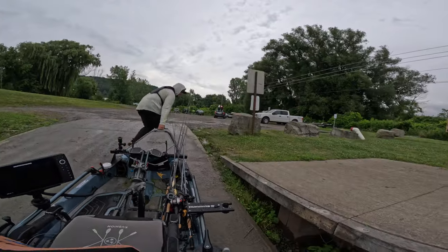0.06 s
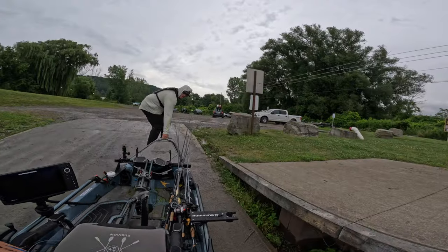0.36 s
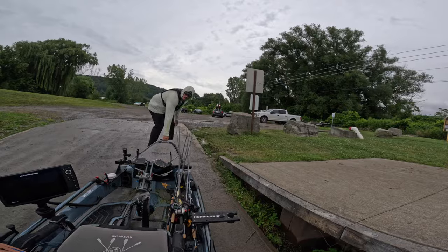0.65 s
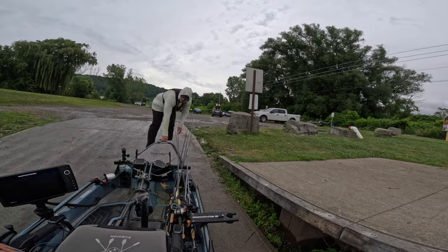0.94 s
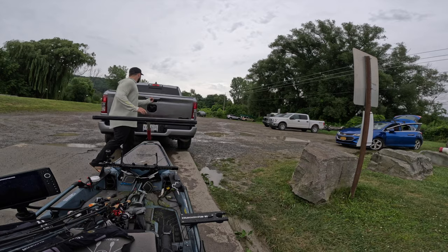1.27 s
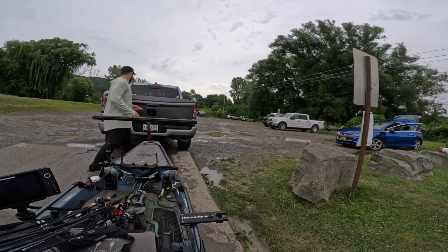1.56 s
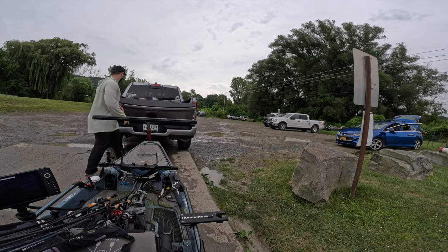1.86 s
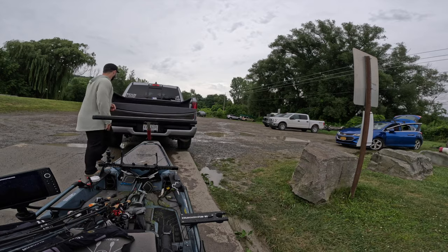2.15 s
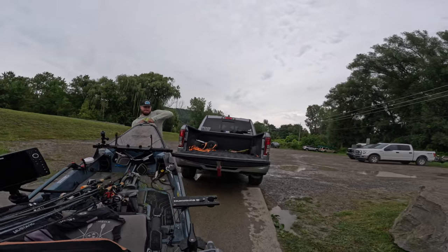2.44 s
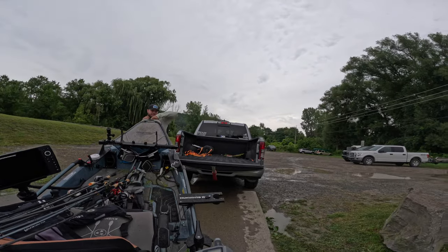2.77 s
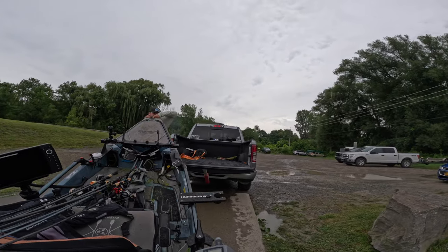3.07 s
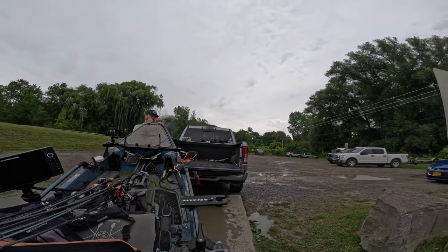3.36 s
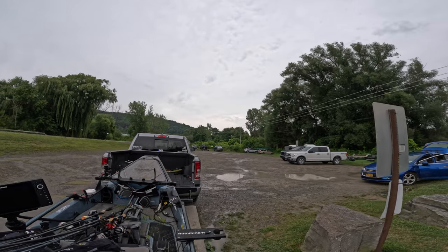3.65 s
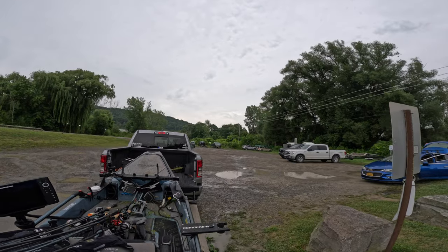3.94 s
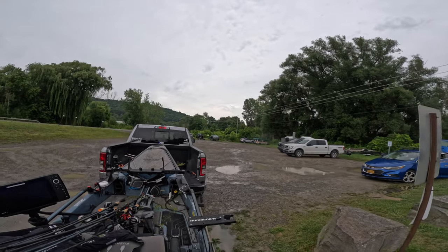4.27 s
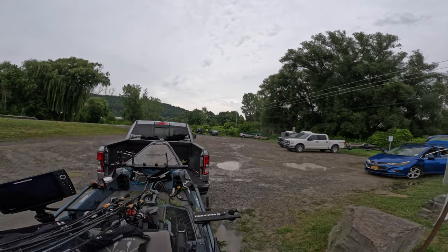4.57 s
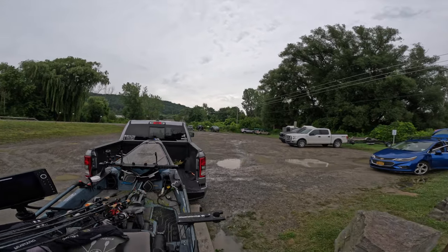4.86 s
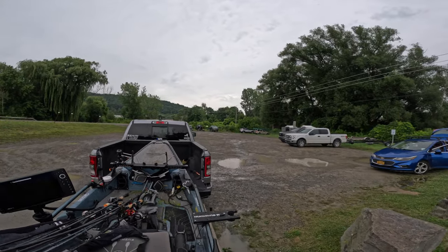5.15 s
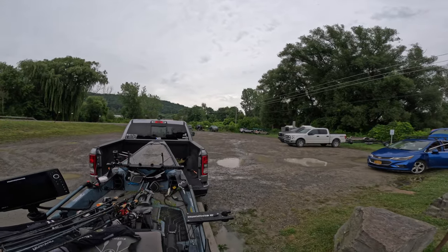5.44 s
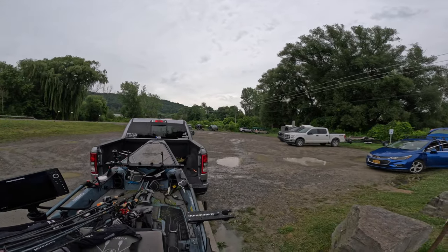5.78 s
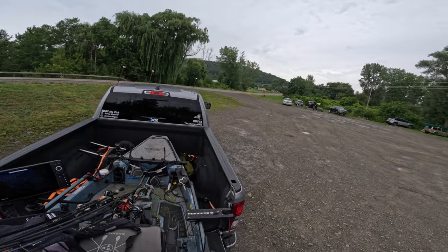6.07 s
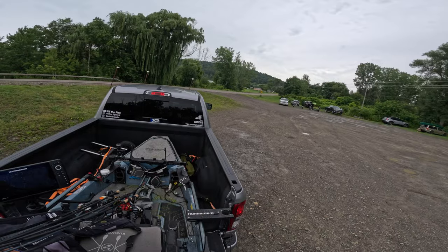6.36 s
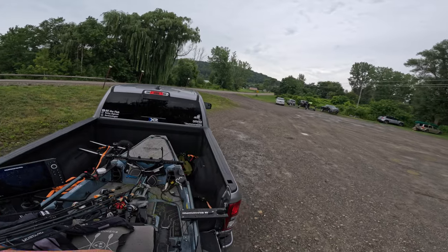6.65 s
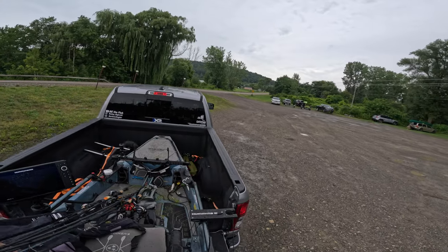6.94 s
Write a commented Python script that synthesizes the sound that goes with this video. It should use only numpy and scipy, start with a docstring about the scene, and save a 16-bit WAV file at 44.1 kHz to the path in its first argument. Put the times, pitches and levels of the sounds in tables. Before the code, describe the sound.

Over low wind and an idling truck, a tailgate clunks open, then a hollow kayak drops on it, bounces and is shoved aboard, gear knocking.

```python
"""A plastic fishing kayak full of gear is hauled up a concrete ramp to an idling pickup, in five shots.
Wind rumbles on the microphone, carried at the stern, as the keel rasps and the bow scuffs the ramp.
Close behind the truck the exhaust throbs, and the tailgate unlatches with a boom.
After more hauling, heard from beside the truck, the bow drops on the tailgate and bounces.
Last, the hollow hull is shoved into the bed, thumping and shuddering while its gear knocks."""
import sys
import numpy as np
from scipy import signal
from scipy.fft import rfft, irfft, next_fast_len
from scipy.io import wavfile

SR = 44100
rng = np.random.default_rng(int(sys.argv[2]) if len(sys.argv) > 2 else 0)


def wav_record(signal):
    """Record a signal, one row per channel, as 16-bit PCM in the file named by sys.argv[1]."""
    frames = np.transpose(np.atleast_2d(signal))
    bounded = np.clip(frames, -1, 1)
    # unit amplitude maps onto the largest positive 16-bit level
    quanta = np.round(bounded * 32767).astype(np.int16)
    wavfile.write(sys.argv[1], SR, quanta)


N = 318181
TIME = np.arange(N) / SR


def from_db(db):
    """Decibels to gain."""
    return 10 ** (np.asarray(db) / 20)


def rms_one(x):
    """Scale to rms 1."""
    return x / np.sqrt(np.mean(x ** 2) + 1e-20)


def at_hz(points, hz):
    """Read a spectrum on a log-frequency axis."""
    f, value = np.transpose(points)
    return np.interp(np.log(hz + 1), np.log(f), value)


def butter(x, hz, kind, order=2):
    """Causal Butterworth filter."""
    sos = signal.butter(order, np.clip(hz, 10, .45 * SR), kind, fs=SR, output="sos")
    return signal.sosfilt(sos, x)


def drift(rate):
    """Smooth random wander of spread 1."""
    r = np.exp(-80 * np.pi * rate / SR)
    slow = signal.lfilter([1], [1, -2 * r, r * r], rng.standard_normal(N // 40 + 2002))[2000:]
    return np.interp(np.arange(N) / 40, np.arange(len(slow)), rms_one(slow))


def panned(pan_db):
    """Left and right gains of constant power; positive is left."""
    gains = from_db(np.array([[.5], [-.5]]) * pan_db)
    return gains / np.sqrt(np.mean(gains ** 2, axis=0))


def white():
    """Two unrelated white noises."""
    return rng.standard_normal((2, N))


def grit(per_s, spread_db):
    """Tiny random slips of very unequal size."""
    slips = white() * (rng.random(N) < per_s / SR)
    return slips * from_db(spread_db * np.minimum(rng.exponential(1, N), 4))


def ring(push, hz, t60, order=1):
    """A unit click sets a sine of height 1 ringing; at order 2 it swells first."""
    r, w = from_db(-60 / (t60 * SR)), 2 * np.pi * hz / SR
    for gain in [1, 2 * np.e * (1 - r)][:order]:
        push = signal.lfilter([gain * np.sin(w)], [1, -2 * r * np.cos(w), r * r], push + 1e-18)
    return push


def add(out, s, sound):
    """Mix a sound in from time s."""
    start = max(round(s * SR), 0)
    out[:, start:start + sound.shape[-1]] += sound[..., :N - start]


def ramp(start_s, length_s):
    """Rise evenly from 0 to 1."""
    return np.clip((TIME - start_s) / length_s, 0, 1)


def stroke(s, length_s, attack_s, sag_db_per_s, release_s):
    """One effort: it builds, tires slowly while held, then dies away."""
    t = np.maximum(TIME - s, 0)
    release = np.exp(-np.clip((t - length_s) / release_s, 0, 30))
    return ramp(s, attack_s) * from_db(-sag_db_per_s * t) * release


# Edges of the shots, in seconds.
CUTS = [0, 1.017, 2.316, 3.435, 5.937, 7.3]
# Microphone on the ramp, behind the truck, beside it, at the tailgate, over the bed. Each row: hiss in
# dB from 2.5 to 8 kHz, wind in dB, engine in dB, stereo opening from 0 (mono) to 1 (wide).
SHOTS = [(-67, -46.5, -95, 0.0026), (-55, -50, -36, 0.79), (-59.5, -40.5, -47, 0.0022),
         (-58, -29.5, -51.5, 1), (-67.5, -39, -58, 0.01)]

def by_shot():
    """Hiss, wind, engine and stereo opening at every sample; each holds until the next cut."""
    return np.array(SHOTS)[np.searchsorted(CUTS, TIME, side="right") - 1].T


# Noise across the microphone's two sides. Each row: frequency in Hz, left-right likeness.
LIKENESS = [(35, 0.8), (130, 1.05), (1000, 0.97)]
# Each row: frequency in Hz, left minus right in dB.
BALANCE = [(400, -3), (1200, 3), (4000, 8)]

def coloured(pair, spectrum, skirt_db_per_octave=30.0):
    """Two unrelated noises become left and right at rms 1, falling off past the spectrum's ends."""
    size = next_fast_len(N)
    hz = np.fft.rfftfreq(size, 1 / SR) + 1
    mid, side = rfft(pair, size)
    alike = np.clip(at_hz(LIKENESS, hz), -1, 1)
    both = np.sqrt(1 + alike) * mid + np.sqrt(1 - alike) * side * [[1], [-1]]
    octaves_out = np.abs(np.log2(hz / np.clip(hz, spectrum[0][0], spectrum[-1][0])))
    gain = from_db(at_hz(spectrum, hz) - skirt_db_per_octave * octaves_out)
    return rms_one(irfft(both * panned(at_hz(BALANCE, hz)) * gain, size)[:, :N])


# Air and engine hiss at the five microphone positions. Each row: frequency in Hz, relative level in dB.
RAMP_AIR = [(100, -12), (300, -14.5), (1200, -15.5), (3200, -29), (7200, -36)]
TRUCK_AIR = [(110, -3), (390, -0.5), (480, -8), (1150, -8.5), (1800, -18), (3500, -21), (4500, -27),
             (7000, -29)]
SIDE_AIR = [(70, 13), (160, -5), (370, -9), (750, -24.5), (1200, -23), (3600, -27), (7500, -41.5)]
GATE_AIR = [(140, 5.5), (300, -18), (650, -21), (1400, -16.5), (2800, -32), (4800, -41), (7400, -46)]
BED_AIR = [(70, 10.5), (210, -5.5), (360, 5), (500, -13), (1300, -16.5), (3000, -25), (5000, -36.5),
           (7200, -37)]

def air(level_db, engine_beat, throb=0.044, bow_down_s=4.35, fall_db=-6.5):
    """Outdoor hiss throbs near the engine; once the bow is down it drops until the next cut."""
    out = np.zeros((2, N))
    for start, end, colour in zip(CUTS, CUTS[1:], [RAMP_AIR, TRUCK_AIR, SIDE_AIR, GATE_AIR, BED_AIR]):
        noise = coloured(white(), colour)
        treble = np.std(butter(noise, [2500, 8000], "band"))
        out += noise / treble * (TIME >= start) * (TIME < end)
    bow_down = ramp(bow_down_s, 0.021) * (TIME < CUTS[4])
    return out * from_db(level_db + fall_db * bow_down) * (1 + throb * engine_beat)


# Wind right on the microphone. Each row: frequency in Hz, relative level in dB.
WIND = [(22, -1.5), (30, 2.5), (44, -8), (70, -12.5)]

def wind(level_db, lumps_db=2.0, lull_db=-6):
    """Lumpy low turbulence; it lulls while the bow is lifted."""
    lull = (TIME >= CUTS[3]) * (TIME < LANDINGS[0][0])
    return from_db(level_db + lull_db * lull + lumps_db * drift(22)) * coloured(white(), WIND)


# The keel on ramp, tailgate and bed. Each row: start in seconds, length in seconds, level in dB.
SLIDES = [(0, 0.21, -54.5), (2.146, 0.08, -46.5), (2.393, 0.26, -46.5), (4.64, 1.28, -42),
          (5.06, 0.11, -38.5)]
# Its rasp. Each row: frequency in Hz, relative level in dB.
RASP_COLOUR = [(250, 7.5), (400, 7), (620, 6.5), (1300, 1.5), (2800, -18), (4500, -27), (7000, -36.5)]
# The loose gear aboard. Each row: frequency in Hz, relative level in dB, t60 in seconds.
GEAR_MODES = [(399, 6.7, 0.014), (1100, 7, 0.0079), (2050, 6.7, 0.005)]

def keel_scrape(shake, chafe_db=-19.5, judder_db=1.8, catch_db=-4.5):
    """The keel rasps as it slides, chafes as the hull shakes, and catches on grit, jolting the gear."""
    slides = [from_db(db) * stroke(s, length, attack_s=0.019, sag_db_per_s=7, release_s=0.015)
              for s, length, db in SLIDES]
    friction = np.sqrt((shake * from_db(chafe_db)) ** 2 + sum(slide ** 2 for slide in slides))
    rasp = coloured(grit(6000, 1.9), RASP_COLOUR)
    jolts = grit(per_s=140, spread_db=2)[0] * from_db(judder_db * drift(12))
    catches = rms_one(sum(from_db(db) * ring(jolts, hz, t60) for hz, db, t60 in GEAR_MODES))
    return friction * from_db(judder_db * drift(20)) * (rasp + from_db(catch_db) * catches)


# Spells of faint ticking. Each row: start in seconds, end in seconds, level in dB.
TICKING = [(0, 0.285, -61), (0.563, 1.015, -70), (5.95, 7.204, -72.5)]

def jiggle():
    """Grit and loose fittings crunch in dry clumps while the kayak is moved."""
    moved = sum(from_db(db) * (TIME >= start) * (TIME < end) for start, end, db in TICKING)
    clumps = from_db(6 * np.minimum(drift(16), 1.8))
    ticks = butter(grit(3000, 2)[0], [1700, 3900], "band", order=3) * clumps
    return moved * rms_one(ticks)


def thumps(rows, pan_db=-3.0, push_s=0.0022, overtone_ratio=1.77, overtone_db=-13):
    """A soft push sets a panel swinging, with a shorter overtone."""
    out, t = np.zeros((2, N)), TIME[:SR // 2]
    for s, db, hz, t60 in rows:
        phase, decay = 2 * np.pi * hz * t, from_db(-60 * t / t60)
        overtone = from_db(overtone_db) * np.sin(overtone_ratio * phase) * decay ** 2
        onset = 1 - np.exp(-(t / push_s) ** 2)
        swing = (np.sin(phase) * decay + overtone) * onset
        add(out, s, from_db(db) * swing / np.abs(swing).max() * panned(pan_db))
    return out


PANEL_CYCLES = 16.6   # swings of a hull panel until it has died by 60 dB
# Shoves on the kayak. Each row: start in seconds, peak in dB, panel pitch in Hz, shudder in seconds.
SHOVES = [(0.049, -29, 77, 0.22), (0.217, -25.5, 91, 0.37), (0.504, -22, 204, 0.021),
          (2.329, -26, 137, 0.45), (3.431, -25.5, 103, 0.0048), (3.913, -28, 119, 0.87),
          (4.789, -20, 124, 0.26), (5.091, -21.5, 131.6, 0.14), (5.363, -16.5, 98, 0.011),
          (5.498, -25, 160, 0.3), (5.665, -28.5, 96, 0.195), (6.184, -27, 179.4, 0.072),
          (6.454, -32, 175, 0.053), (6.705, -28, 248, 0.1), (6.967, -25.5, 120, 0.053)]

def shove_thumps():
    """Each shove thumps a plastic panel of the hull."""
    return thumps([(s, db, hz, PANEL_CYCLES / hz) for s, db, hz, _ in SHOVES])


def shaking(against_shove_db=-7, rest_db=-44.5):
    """How hard the hull shakes: a little at rest, more after every shove."""
    power = from_db(rest_db) ** 2
    for s, db, _, length in SHOVES:
        effort = stroke(s, length, attack_s=0.012, sag_db_per_s=26.5, release_s=0.023)
        power += (from_db(db + against_shove_db) * effort) ** 2
    return np.sqrt(power)


# The hollow hull, heard from the stern. Each row: frequency in Hz, relative level in dB.
HOLLOW = [(60, 7), (100, 4), (170, -2), (260, -9), (400, -19.5)]

def hull_shudder(shake):
    """Small slips shake the hull into a low rumble."""
    return shake * coloured(grit(900, 1.0), HOLLOW) * panned(-3.5)


def blows(rows, modes, rattle, tail_db, tail_s, pan_db, treble_pan_db=0, order=1):
    """A contact and its dying rattle ring the modes; loose parts buzz on; high modes may lean left."""
    out, t = np.zeros((2, N)), TIME[:SR // 2]
    sides = [panned(pan_db + at_hz([(1000, 0), (8000, treble_pan_db)], hz)) for hz, _, _ in modes]
    for s, db, hard_hz, rattle_s in rows:
        noise = rng.standard_normal((3, len(t)))
        chatter = noise[0] * np.exp(-t / rattle_s) * np.sqrt(2 / (rattle_s * SR))
        buzz = noise[1:] * np.exp(-t / tail_s) * np.sqrt(2 / (tail_s * SR))
        push = butter((t == 0) + rattle * chatter + from_db(tail_db) * buzz, hard_hz, "low")
        body = sum((-1) ** k * sides[k] * from_db(mode_db) * ring(push, hz, t60, order)
                   for k, (hz, mode_db, t60) in enumerate(modes))
        body = butter(body, 140, "high")
        strength = np.sqrt(np.sum(body ** 2) / (2 * .01 * SR))   # rms if packed into 10 ms
        add(out, s, from_db(db) * body / strength)
    return out


# Blows on the hull. Each row: start in seconds, level in dB, hardness in Hz, rattle in seconds.
HULL_KNOCKS = [(0.211, -35, 395, 0.015), (2.417, -34, 1900, 0.0085), (2.455, -35.5, 3000, 0.012),
               (2.591, -37.5, 1700, 0.0045), (4.219, -20, 6000, 0.0039), (4.317, -40, 300, 0.0055),
               (4.487, -31.5, 590, 0.014), (4.549, -32, 6000, 0.017), (5.347, -36, 2200, 0.0071),
               (6.774, -42.5, 2200, 0.019)]
# Its shell. Each row: frequency in Hz, relative level in dB, t60 in seconds.
HULL_MODES = [(346, 0.5, 0.034), (513.5, -6, 0.089), (830, 8, 0.0048), (1227, 4.5, 0.0058),
              (2330, -2.5, 0.0037), (6500, -25.5, 0.0012)]

def hull_knocks():
    """The plastic shell rings briefly when struck."""
    return blows(HULL_KNOCKS, HULL_MODES, rattle=0.98, tail_db=-6.0, tail_s=0.013, pan_db=-5.0)


# Fittings, left of the microphone. Each row: start in seconds, peak in dB, band centre in Hz.
CLICKS = [(0.253, -43, 2920), (0.702, -49.5, 3100), (0.996, -39.5, 2840), (1.12, -24, 600),
          (4.257, -42.5, 6600), (4.256, -29.5, 1100), (4.989, -26, 1230), (5.02, -38, 1180),
          (5.975, -36.5, 3200), (6.565, -38, 540)]

def fitting_clicks(t60=0.033, band_ratio=1.14, pan_db=10.5):
    """Small fittings click in short, narrow bursts."""
    out, t = np.zeros((2, N)), TIME[:SR // 8]
    for s, db, hz in CLICKS:
        burst = rng.standard_normal(len(t)) * from_db(-60 * t / t60)
        burst = butter(burst, [hz / band_ratio, hz * band_ratio], "band")
        add(out, s, from_db(db) * burst / np.abs(burst).max())
    return out * panned(pan_db)


# The bow, a boat's length off. Each row: start in seconds, level in dB, hardness in Hz, rattle in seconds.
BOW_SCUFFS = [(.436, -32.5, 4600, 0.063), (.494, -25.5, 10000, 0.013)]
# Its ring. Each row: frequency in Hz, relative level in dB, t60 in seconds.
BOW_MODES = [(438, 5, 0.0044), (1144, -5.5, 0.011), (2450, -4.5, 0.0026), (5100, -17.5, 0.0051),
             (7800, -13, 0.0014)]

def bow_scuffs():
    """The bow chatters over concrete."""
    return blows(BOW_SCUFFS, BOW_MODES, rattle=14.0, tail_db=-15, tail_s=0.035, pan_db=-1)


# Gear shifting aboard. Each row: centre in seconds, level in dB, half-width in seconds.
SWISHES = [(0.491, -44.5, 0.02), (4.981, -57.5, 0.049), (5.236, -59, 0.044)]
# Its colour. Each row: frequency in Hz, relative level in dB.
SWISH_COLOUR = [(2200, -3), (7000, -15), (9000, -28)]

def gear_swishes():
    """Gear rubs in short, bright swells of tiny slips."""
    swells = sum(from_db(db) * np.exp(-((TIME - s) / width) ** 2) for s, db, width in SWISHES)
    return swells * coloured(grit(4800, 1.9), SWISH_COLOUR)


# The tick at each cut between shots: peak in dB.
SPLICE_DB = [-35, -29, -24, -22]

def splices(settle_s=0.0048):
    """The pressure jumps at a cut and settles at once."""
    out = np.zeros((2, N))
    for s, db in zip(CUTS[1:], SPLICE_DB):
        add(out, s, -from_db(db) * np.exp(-TIME[:SR // 10] / settle_s))
    return out


# The exhaust, loudest behind the truck: relative dB of each multiple of the firing rate, from the first.
EXHAUST_DB = [-28.5, -1.5, -25, -5.5, -16.5, -8.5, -15.5, -27, -14.5, -12, -16.5, -13.5]
# Belt drive and engine covers. Each row: frequency in Hz, level in dB against the engine's.
BELT_WHINE = [(927, -18.5), (1101, -14.5)]
COVER_MODES = [(960, -26), (1130, -14.5), (1490, -20), (2390, -29), (3230, -29)]

def engine(level_db, firings_hz=(34.95, 34.3), wobble_db=2.0, boom_pan_db=7.0):
    """Firings drive the exhaust and ring the covers over a belt whine; also returns the engine's beat."""
    per_s = np.where(TIME < CUTS[2], *firings_hz)   # the idle has settled a little by the third shot
    per_s = per_s * (1 + .001 * drift(3))
    phase = 2 * np.pi * np.cumsum(per_s) / SR
    out = np.zeros((2, N))
    for k, db in enumerate(EXHAUST_DB, 1):
        tone = np.sin(k * phase + rng.uniform(0, 2 * np.pi)) * from_db(db + wobble_db * drift(1.47))
        out += np.sqrt(2) * tone * panned(boom_pan_db * (k < 5))   # the tailpipe's boom lies to the left
    for hz, db in BELT_WHINE:
        turns = np.cumsum(hz * (1 + .004 * drift(20))) / SR
        out += np.sqrt(2) * np.sin(2 * np.pi * turns) * from_db(db + 2 * drift(9))
    clatter = rng.standard_normal(N) * (1 + .5 * np.sin(phase))
    for hz, db in COVER_MODES:
        out += from_db(db) * rms_one(ring(clatter, hz, t60=0.042, order=2))
    nearness = from_db(level_db - level_db.max())
    return out * from_db(level_db), np.sin(2 * phase) * nearness


# The truck's sound at the microphone. Each row: frequency in Hz, lag of the left port in radians.
PORT_LAG = [(80, 0.11), (300, 1.34)]

def off_axis(x):
    """Sound from the truck reaches the two ports out of step."""
    lag = at_hz(PORT_LAG, np.fft.rfftfreq(2 * N, 1 / SR))
    return irfft(rfft(x, 2 * N) * np.exp(1j * lag * [[-.5], [.5]]))[:, :N]


# The latch, close by. Each row: start in seconds, level in dB, hardness in Hz, rattle in seconds.
LATCH_BLOWS = [(1.121, -21.5, 900, 0.15), (1.1595, -17.5, 12200, 0.0063), (1.171, -22, 4400, 0.024),
               (1.204, -30.5, 9000, 0.0054)]
# Its ring. Each row: frequency in Hz, relative level in dB, t60 in seconds.
LATCH_MODES = [(285, -5.5, 0.092), (560, -2.5, 0.022), (790, 1, 0.011), (1460, 0, 0.0067),
               (1920, 2, 0.0056), (3200, 9, 0.00092), (5750, -2, 0.0034), (7280, -6.5, 0.0082)]

def tailgate_latch():
    """The latch lets go in a quick run of rattling blows."""
    return blows(LATCH_BLOWS, LATCH_MODES, rattle=5.1, tail_db=5.5, tail_s=0.029,
                 pan_db=-0.2, treble_pan_db=10.0)


# The tailgate, to the left. Each row: frequency in Hz, peak in dB, t60 in seconds.
TAILGATE_MODES = [(90.5, -18, 0.25), (152.7, -27, 0.47), (255, -18, 0.2), (321, -22.5, 0.16)]

def tailgate_boom(free_s=1.165):
    """The tailgate comes free and its panel booms."""
    return thumps([(free_s, db, hz, t60) for hz, db, t60 in TAILGATE_MODES], pan_db=7.5)


# The bow on the tailgate. Each row: start in seconds, peak in dB, panel pitch in Hz, bed boom in dB.
LANDINGS = [(4.192, -15.5, 115, -41), (4.219, -13, 93.2, -10.5), (4.316, -11.5, 99.3, -16),
            (4.488, -22, 234, -17.5)]

def bow_landings(bed_lag_s=0.01086, bed_hz=67.2, bed_t60_s=0.3):
    """The bow touches, drops and bounces; the truck bed booms a moment after each landing."""
    hull = [(s, db, hz, PANEL_CYCLES / hz) for s, db, hz, _ in LANDINGS]
    bed = [(s + bed_lag_s, db, bed_hz, bed_t60_s) for s, _, _, db in LANDINGS]
    return thumps(hull + bed)


# Bow against steel. Each row: start in seconds, level in dB, hardness in Hz, rattle in seconds.
STEEL_KNOCKS = [(4.222, -23.5, 1500, 0.0034)]
# The steel. Each row: frequency in Hz, relative level in dB, t60 in seconds.
STEEL_MODES = [(387, -2.5, 0.12), (517, 3, 0.109), (622, 4.5, 0.13)]

def steel_knock():
    """The tailgate's steel rings as the bow drops on it."""
    return blows(STEEL_KNOCKS, STEEL_MODES, rattle=0.1, tail_db=-20, tail_s=0.02, pan_db=-5.5)


# Gear, to the right. Each row: start in seconds, level in dB, hardness in Hz, rattle in seconds.
GEAR_KNOCKS = [(4.6612, -19, 3500, .001), (4.977, -36.5, 5870, .003), (5.082, -36.5, 7160, 0.0075),
               (5.098, -35, 2530, 0.0039), (5.149, -45, 5000, .006)]

def gear_knocks():
    """Loose gear knocks as the hull slides into the bed."""
    return blows(GEAR_KNOCKS, GEAR_MODES, rattle=0.24, tail_db=-7.5, tail_s=0.0065, pan_db=-8.5, order=2)


def scene():
    """Truck, weather and kayak in the open air."""
    hiss_db, wind_db, engine_db, _ = by_shot()
    idle, engine_beat = engine(engine_db)
    shake = shaking()
    knocks = hull_knocks() + gear_knocks() + steel_knock() + bow_scuffs()
    truck = off_axis(idle + tailgate_latch() + air(hiss_db, engine_beat))
    rumble = wind(wind_db)
    dragging = hull_shudder(shake) + keel_scrape(shake) + gear_swishes() + jiggle()
    booms = shove_thumps() + tailgate_boom() + bow_landings()
    return truck + rumble + dragging + booms + knocks + fitting_clicks()


def record(dry, narrows_at_s=4.345, narrowing_s=0.86, low_cut_hz=14, high_cut_hz=16200):
    """Spliced, band-limited shots, some mono; the image closes during the slide into the bed."""
    *_, opening = by_shot()
    width = opening * (1 - ramp(narrows_at_s, narrowing_s))
    mid = dry.mean(0)
    both = butter(mid + width * (dry - mid) + splices(), low_cut_hz, "high")
    return signal.sosfilt(signal.ellip(10, .2, 80, high_cut_hz, fs=SR, output="sos"), both)


dry = scene()
out = record(dry)
wav_record(out)
```